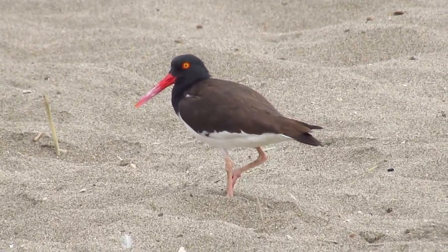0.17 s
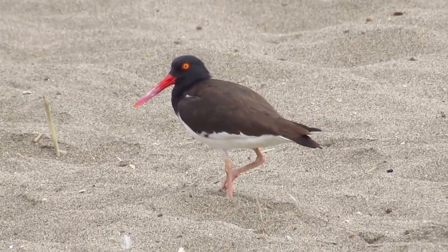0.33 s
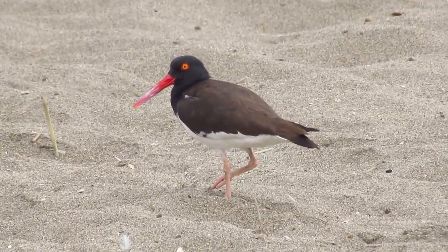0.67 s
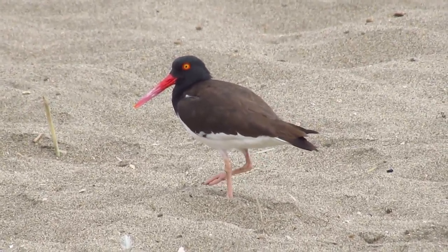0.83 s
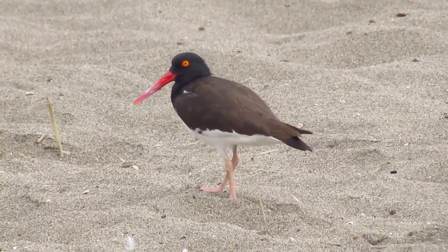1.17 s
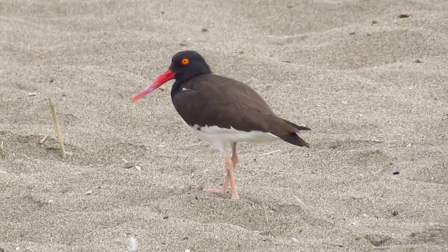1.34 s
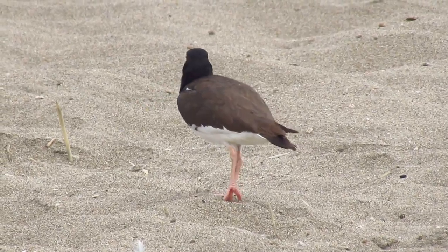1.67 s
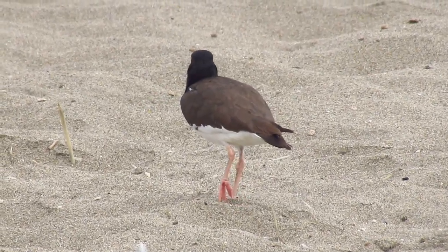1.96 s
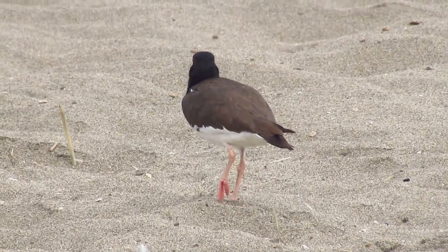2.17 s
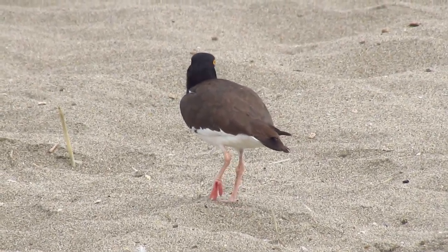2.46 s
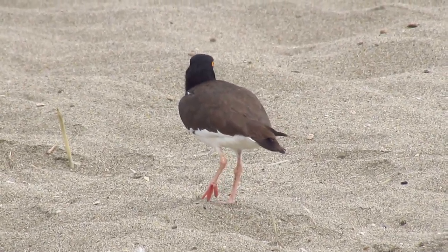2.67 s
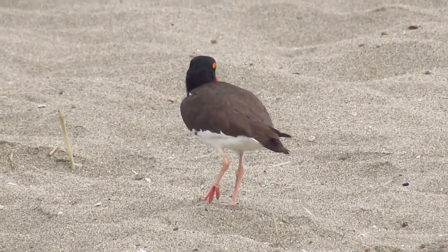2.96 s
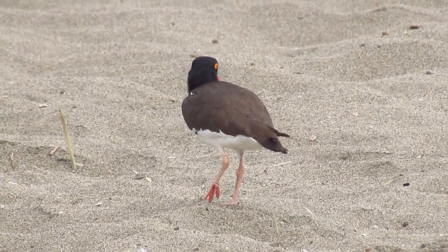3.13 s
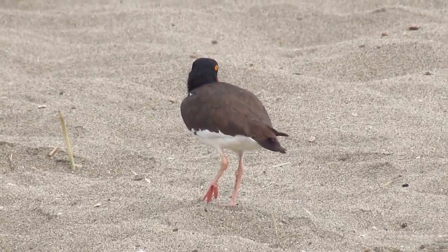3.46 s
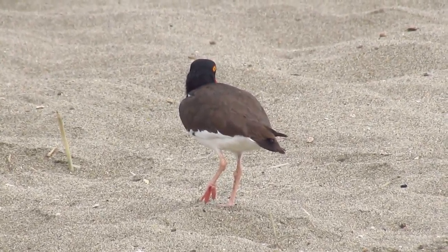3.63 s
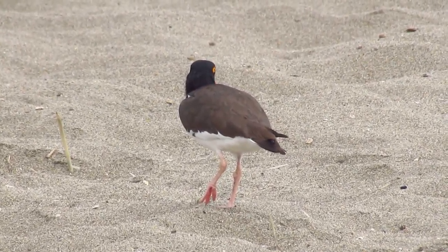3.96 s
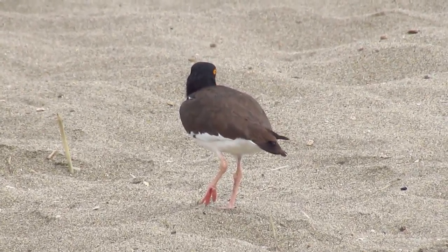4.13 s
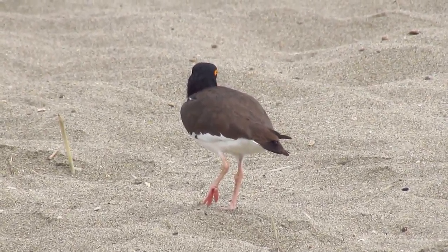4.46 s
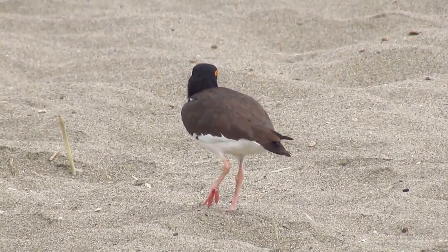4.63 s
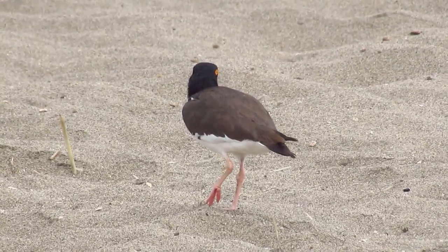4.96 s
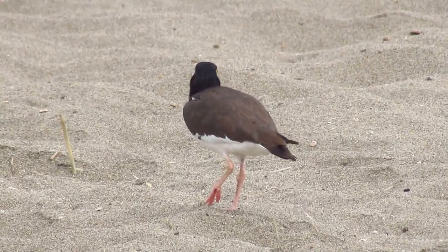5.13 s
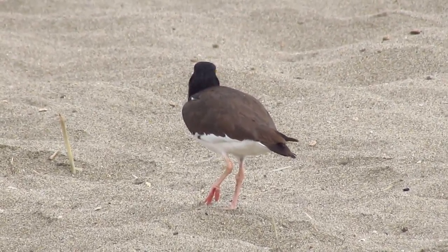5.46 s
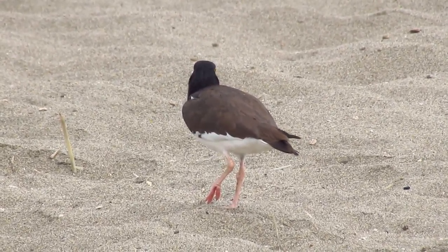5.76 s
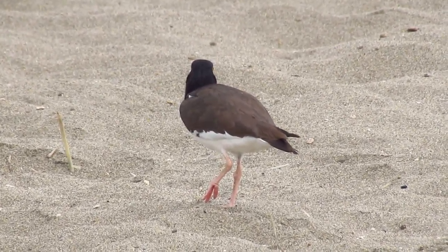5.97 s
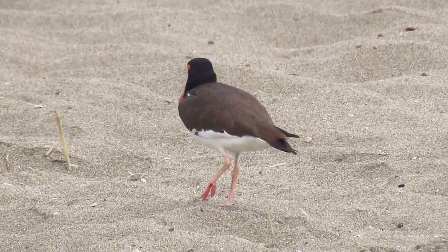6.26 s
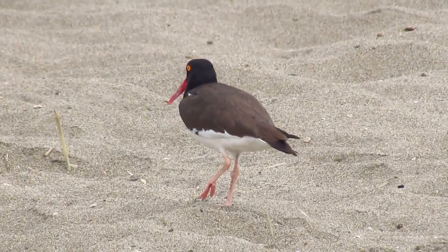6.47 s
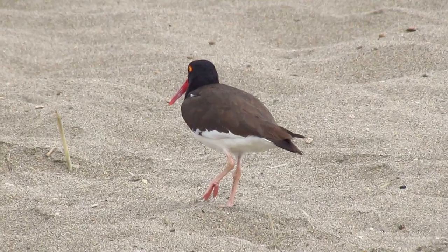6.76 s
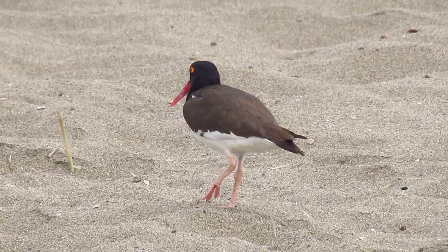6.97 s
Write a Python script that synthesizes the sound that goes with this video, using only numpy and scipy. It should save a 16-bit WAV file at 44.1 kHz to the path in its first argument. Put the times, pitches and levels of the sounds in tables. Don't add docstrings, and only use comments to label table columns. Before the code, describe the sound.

An open sandy beach with oystercatchers, heard through a small wind-struck stereo microphone. Low wind rumble runs throughout, heaviest on the right, with irregular thumps and fluttering rattles; faint smooth surf hiss lies behind. From 0.1 s distant birds on the left give short, thin pips, often in pairs, and a faint arched whistle at 0.5 s. Buffets thud around 0.7 s. A clear falling whistle breaks from a tiny rattle at 1.4 s, a fainter one at 1.8 s. The hardest gust cracks at 2.25 s, briefly hushing the surf. Sharper calls follow at 3.0, 3.7 and 4.7 s, amid dense buffeting from 3.5 to 4.5 s. From 5.3 to 6.4 s a lower bird trills, slowing while climbing slightly. At 6.5 s a close bird whistles loudly, dropping in pitch; after a hoarse chirp at 6.8 s, its last whistle is cut short at 7.1 s.

```python
import sys
import numpy as np
from scipy import signal
from scipy.fft import rfft, irfft
from scipy.io import wavfile
from scipy.ndimage import uniform_filter1d

SR = 44100
rng = np.random.default_rng(int(sys.argv[2]) if len(sys.argv) > 2 else 0)


def transcribe(signal):
    frames = np.atleast_2d(signal).T
    limited = np.clip(frames, -1, 1)
    pcm = np.round(limited * 32767).astype(np.int16)
    wavfile.write(sys.argv[1], SR, pcm)


def volts_from_db(level):
    exponent = np.asarray(level, float) / 20
    return 10 ** exponent


N = 313110

# start in seconds, crack level in dB, gain drop after it in dB.
OVERLOADS = [
    (0.6688, -50, -3),
    (2.2554, -32, -10.5),
    (3.554, -40, -2),
    (6.21, -42, -1.5),
]


def evened(x):
    return x / np.sqrt(np.mean(x ** 2) + 1e-20)


def read(points, hz, column=1):
    table = np.transpose(points)
    return np.interp(np.log(hz + 1), np.log(table[0] + 1), table[column])


def add(mix, s, sound):
    part = mix[round(s * SR):][:len(sound)]
    part += sound[:len(part)]


def band_noise(size, order, low_hz, high_hz):
    band = signal.butter(order, [low_hz, high_hz], "band", fs=SR, output="sos")
    return signal.sosfilt(band, rng.standard_normal(size))


def partials(hz, levels_db, multiples, edge_s, broken_db=0, rough=0):
    wobble = uniform_filter1d(rng.standard_normal(len(hz)), 120)
    turns = np.cumsum(hz * (1 + (0.016 + rough) * wobble)) / SR
    stack = np.zeros(len(hz))
    for k, db in zip(multiples, levels_db):
        noise = rng.standard_normal(len(hz))
        flicker = evened(uniform_filter1d(uniform_filter1d(noise, 180), 180))
        sine = np.cos(2 * np.pi * k * turns + k * k)
        stack += volts_from_db(db + broken_db * flicker) * sine * (k * hz < 15600)
    return np.sqrt(2) * stack * signal.windows.tukey(len(hz), min(1, 2 * edge_s * SR / len(hz)))


def unroll(rows):
    s, *columns = np.transpose(rows)
    t = np.arange(s[0], s[-1], 1 / SR)
    return s[0], [np.interp(t, s, c) for c in columns]


def whistle(rows, colour, share, first_dull_db=0):
    s, (hz, effort_db, bill_db) = unroll(rows)
    sag = 1 - hz / hz.max()
    hook = 1 - 0.047 * np.exp(-np.arange(len(hz)) / SR / 0.0021)
    first_db = effort_db + np.linspace(colour[0], colour[1], len(hz)) + first_dull_db * sag
    top_db = effort_db + share * (bill_db - effort_db) - 36 * sag
    levels_db = [first_db, effort_db, bill_db] + [top_db + db for db in colour[2:]]
    first_hz = uniform_filter1d(hz / 2, 350, mode="nearest") * hook
    return s, partials(first_hz, levels_db, range(1, 7), edge_s=0.0019, broken_db=0.6)


def far_whistle(s, length, from_hz, to_hz, second_db, first_db):
    u = np.linspace(0, 1, round(length * SR))
    hz = (from_hz + (to_hz - from_hz) * u) / 2 * (1 + 0.01485 * np.sin(np.pi * u))
    return s, partials(hz, [first_db, second_db], range(1, 3), edge_s=.01, broken_db=3.0)


def add_whistles(flock, near):
    # time in seconds, second partial in Hz, its effort in dB, overtone strength from bill in dB.
    early = [
        [(.52, 4980, -61, -61), (.57, 5150, -56.5, -69), (.62, 5250, -51, -72), (.714, 5080, -54, -75),
         (.765, 4720, -59, -72)],
        [(1.383, 4760, -41, -60), (1.392, 4930, -40, -54), (1.425, 5130, -39, -53), (1.455, 5234, -40, -52),
         (1.487, 4980, -43, -56), (1.503, 5000, -43, -58), (1.54, 4520, -47.5, -71), (1.56, 4200, -54, -91)],
        [(3.033, 4700, -39.5, -54), (3.042, 4970, -37.5, -48), (3.057, 5190, -36.5, -51),
         (3.085, 5040, -38.5, -51), (3.109, 5190, -37.5, -50), (3.133, 4860, -38.5, -50),
         (3.177, 4360, -42.5, -68), (3.188, 4290, -44, -75)],
    ]
    later = [
        [(3.737, 4660, -44.5, -49.5), (3.79, 5120, -42.5, -55), (3.825, 5196, -39.5, -63),
         (3.89, 5150, -41.5, -60), (3.934, 4830, -45, -55), (3.955, 4530, -51, -63)],
        [(4.727, 4880, -41, -48), (4.738, 5020, -37.5, -40), (4.763, 5177, -36.5, -41.5),
         (4.841, 5070, -37.5, -40), (4.879, 4390, -41.5, -62), (4.905, 4210, -47, -65)],
        [(1.838, 4840, -60, -59), (1.864, 5330, -54.5, -69), (1.892, 5320, -49.5, -57),
         (1.92, 5090, -50.5, -69), (1.945, 5250, -47.5, -68), (2.008, 5235, -47, -76),
         (2.045, 5080, -46.5, -56), (2.07, 4800, -46.5, -51.5), (2.085, 4430, -54, -73)],
    ]
    close = [
        [(6.549, 4670, -36, -59), (6.56, 4770, -36, -52), (6.58, 4896, -33, -44.5), (6.61, 4946, -35, -51),
         (6.647, 4890, -37.5, -44.5), (6.685, 4360, -36, -57), (6.712, 4120, -36.5, -74),
         (6.742, 3820, -43.5, -78)],
        [(6.897, 4400, -45, -51), (6.905, 4740, -41, -47), (6.93, 4900, -49, -69), (6.962, 5130, -42, -49),
         (7.008, 4930, -42, -59), (7.028, 4970, -42, -65), (7.065, 4810, -40.5, -68), (7.1, 4730, -40, -50)],
    ]
    # first partial at the start in dB, at the end in dB, fourth, fifth and sixth partial in dB.
    colours = [(-3, -2.5, -14, -38, -52), (-9, 1, -10.5, -34, -53), (-4.5, -2, -13, -23, -48),
               (2.5, 2.5, -20, -29.5, -52), (-2, -1, -9.5, -20.5, -45), (14.5, -11, -13, -29, -50)]
    near_colours = [(-9, -9.5, -18, -26, -35), (3.5, -2.5, -28, -19, -41)]
    bill_shares = [.5, .5, .5, .5, .5, .3, .5, .15]
    # start and length in seconds, second partial from Hz, to Hz, second and first partial in dB.
    far_calls = [
        (0.22, 0.29, 5050, 5400, -71, -68),
        (1.03, 0.153, 4620, 4600, -63.5, -71),
        (2.601, 0.207, 5090, 5120, -73, -67.5),
        (3.75, 0.12, 4140, 4500, -65, -80),
        (4.154, .132, 4310, 4660, -61, -67),
        (5.001, 0.195, 5320, 5400, -70, -72),
    ]
    for rows, colour, share in zip([*early, *later], colours, bill_shares):
        add(flock, *whistle(rows, colour, share))
    for rows, colour, share in zip(close, near_colours, bill_shares[-2:]):
        add(near, *whistle(rows, colour, share, first_dull_db=-82))
    for row in far_calls:
        add(flock, *far_whistle(*row))


def low_register(rows, dull_db=0):
    # frequency in Hz, throat gain in dB.
    throat = [(2000, -1.5), (3300, 0.5), (4300, 4.5), (5000, -3.5), (7000, -20), (11000, -26)]
    s, (hz, first_db, throat_db, *half) = unroll(rows)
    half = np.clip(half[0] if half else .02, .01, 3)
    multiples = np.arange(2, 14) / 2
    levels_db = [first_db]
    for k in multiples[1:]:
        half_db = 20 * np.log10(half) * (k % 1 > 0)
        levels_db.append(throat_db + read(throat, k * hz) + dull_db * max(k - 2, 0) + half_db)
    slack = np.minimum(half, 1)
    return s, partials(hz, levels_db, multiples, edge_s=0.0011, broken_db=1.0 + 0.3 * slack, rough=0.12 * slack)


def climb(s, length, from_hz, to_hz, db, early, first_db=-17):
    shape = [(0, 0, -11, 0.36), (.25, 0.46 * early, 0.5, 0.17), (.55, early, 2, .1), (1, 0.83, 1, 0.18)]
    return low_register([(s + u * length, from_hz + up * (to_hz - from_hz), db + first_db + soft_db, db + soft_db, half)
                         for u, up, soft_db, half in shape])


def split(s, length, from_hz, to_hz, db, linger):
    shape = [(0, 0, -3), (linger, .06, 0), (.4 + 0.67 * linger, .6, -1), (1, 1, -7)]
    return low_register([(s + u * length, from_hz + up * (to_hz - from_hz), db - 7, db + soft_db, 2.5)
                         for u, up, soft_db in shape])


def lead_in(s, end, hz, first_db, throat_db, dull_db=0):
    swell_db, hz_per_s = -9.5, 6750
    return low_register([(s, hz, first_db + swell_db, throat_db + swell_db),
                         (end, hz + hz_per_s * (end - s), first_db, throat_db)], dull_db)


def tick(s, db):
    noise = band_noise(260, 2, 2200, 6500)
    return s - .003, volts_from_db(db) * evened(noise) * np.hanning(len(noise))


def rasp(s, length, low_hz, high_hz, db):
    u = np.linspace(0, 1, round(length * SR))
    noise = evened(band_noise(len(u), 3, low_hz, high_hz))
    return s, volts_from_db(db) * noise * u ** 0.79 * np.minimum((1 - u) / .12, 1)


def curl(s, length, from_hz, to_hz, db):
    u = np.linspace(0, 1, round(length * SR))
    return s, partials(from_hz + (to_hz - from_hz) * u ** 2.2, [db], [1], edge_s=.003, broken_db=4.0)


def add_run_ups(flock, near):
    # start and length in seconds, from Hz, to Hz, throat level in dB, early share of the rise (0-1).
    climbs = [
        (1.321, 0.028, 1197, 1700, -58.5, 0.46),
        (1.787, 0.023, 1275, 1570, -64, 0.6),
        (2.955, 0.034, 1110, 1520, -56.5, .8),
        (3.672, 0.039, 1253, 1570, -59, .75),
        (4.647, 0.046, 1087, 1490, -54.5, 0.9),
        (6.481, 0.04, 1070, 1487, -54.5, 0.68),
    ]
    # start and length in seconds, from Hz, to Hz, throat level in dB.
    half_line_strokes = [
        (1.347, 0.028, 1520, 1820, -66),
        (2.983, 0.027, 1420, 1760, -60.5),
        (3.652, 0.027, 1484, 1600, -66),
        (4.679, 0.033, 1440, 1770, -61),
        (6.508, 0.022, 1380, 1640, -57),
    ]
    lingers = [.15, 0.11, .3, .45, 0.38]
    # start and break in seconds, from Hz, first partial in dB, throat level in dB.
    lead_ins = [
        (1.366, 1.387, 1724, -56, -68),
        (1.808, 1.84, 1640, -52, -56.5),
        (2.996, 3.037, 1670, -49, -57),
        (3.708, 3.736, 1590, -51.5, -53.5),
        (4.699, 4.729, 1733, -45, -55),
        (6.511, 6.55, 1586, -48.5, -57),
        (6.858, 6.896, 1483, -43, -36.5),
    ]
    # time in seconds, level in dB.
    breaks = [
        (1.383, -54),
        (2.988, -51),
        (3.036, -54),
        (3.738, -54),
        (4.696, -48),
        (4.729, -53),
        (6.514, -50),
        (6.553, -54),
        (6.9, -54),
    ]
    # start and length in seconds, low Hz, high Hz, level in dB.
    rasps = [
        (2.94, 0.083, 2400, 5770, -54),
        (3.648, 0.049, 2200, 5800, -53),
        (4.632, 0.079, 2200, 6500, -53),
        (6.455, 0.055, 2500, 5800, -58),
        (6.822, 0.045, 3400, 4330, -44.5),
    ]
    # start and length in seconds, from Hz, to Hz, level in dB.
    near_strokes = [
        (6.824, .043, 3560, 4700, -55),
        (6.848, 0.017, 1230, 1500, -51),
    ]
    splits = [(*row, linger) for row, linger in zip(half_line_strokes, lingers)]
    for mix, voice, calls in [(flock, climb, climbs[:-1]), (flock, split, splits[:-1]), (near, split, splits[-1:]),
                              (near, curl, near_strokes), (flock, lead_in, lead_ins[:-2]),
                              (flock, rasp, rasps[:-2]), (near, rasp, rasps[-2:]),
                              (flock, tick, breaks[:-3]), (near, tick, breaks[-3:])]:
        for row in calls:
            add(mix, *voice(*row))
    add(near, *climb(*climbs[-1], first_db=2))
    for row in lead_ins[-2:]:
        add(near, *lead_in(*row, dull_db=-18))


def tail(s, length, hz, db, throat_db, sag_per_s=1.5):
    return low_register([(s + u * length, hz * (1 - sag_per_s * length * u ** 1.2), db - 7 * u, throat_db)
                         for u in (0, .5, 1)])


def add_tails(flock, near):
    # start and length in seconds, start Hz, first partial in dB, throat level in dB.
    tails = [
        (1.561, 0.097, 1710, -63, -78),
        (3.19, 0.033, 1790, -48.5, -62),
        (3.946, 0.045, 1705, -53.5, -70),
        (4.895, 0.036, 1700, -59, -70),
        (6.739, 0.056, 1550, -50.5, -67),
    ]
    # start and length in seconds, from Hz, to Hz, level in dB.
    curls = [
        (1.558, .04, 3480, 3250, -62),
        (3.952, 0.0089, 3530, 3270, -54),
        (3.989, .022, 3080, 2750, -59),
        (4.014, .014, 2600, 2100, -67),
        (4.276, 0.02, 4630, 3670, -62),
    ]
    for row in tails[:-1]:
        add(flock, *tail(*row))
    for row in curls:
        add(flock, *curl(*row))
    add(near, *tail(*tails[-1], sag_per_s=4))


def pip(s, length, top_hz, *levels_db):
    u = np.linspace(0, 1, round(length * SR))
    arch = 1 - np.where(u < .3, 0.042 * (1 - u / 0.36) ** 2, 0.103 * ((u - .3) / 0.7) ** 2)
    return s, volts_from_db(-0.9 - 5.7 * u ** 2) * partials(top_hz * arch, levels_db, range(1, 4), edge_s=0.0022)


def grace(s, top_hz, first_db):
    hz = top_hz * np.linspace(.6, .76, 700)
    return s - .016, partials(hz, [first_db - 16, first_db - 15], range(1, 3), edge_s=0.0035)


def add_pips(flock):
    # start in seconds, top Hz, first partial in dB, second partial in dB.
    pips = [(0.127, 2470, -58, -63), (.194, 2470, -56, -55), (.393, 2460, -55, -57),
            (0.468, 2370, -55, -60), (0.919, 2506, -57, -64), (1.005, 2420, -58, -65),
            (1.736, 2430, -61, -60), (2.089, 2346, -59, -59), (2.55, 2430, -60, -66),
            (2.62, 2390, -67, -63), (2.817, 2420, -56.5, -60.5), (2.89, 2400, -56, -62),
            (3.17, 2410, -52, -54), (3.373, 2430, -52.5, -56.5), (3.446, 2420, -55, -56.5),
            (3.999, 2380, -68, -60), (4.187, 2400, -69, -57), (4.268, 2370, -64, -59),
            (4.395, 2260, -70, -67), (4.481, 2390, -72, -58), (4.555, 2380, -72, -65),
            (5.106, 2490, -59, -64), (5.174, 2390, -59, -63), (5.403, 2400, -56, -61),
            (5.655, 2380, -58, -64), (5.735, 2330, -63, -69), (5.925, 2400, -63, -64),
            (5.994, 2330, -62, -59), (6.735, 2250, -67, -64), (6.956, 2240, -64, -63)]
    for s, hz, first_db, second_db in pips:
        third_db = second_db - 15 + 11 * s * SR / N
        add(flock, *pip(s, .035, hz, first_db, second_db, third_db))


def add_trill(flock):
    # start in seconds, level in dB.
    trill = [(5.268, -57), (5.348, -55), (5.432, -51.5), (5.517, -50.5), (5.607, -53), (5.703, -50.5),
             (5.807, -48.5), (5.917, -51), (6.01, -55), (6.1, -56), (6.214, -55), (6.318, -52),
             (6.419, -56)]
    for s, db in trill:
        hz = 1996 + 291 * (s - trill[0][0])
        add(flock, *pip(s, 0.0263, hz, db, db - 12, db - 15))
        add(flock, *grace(s, hz, db))


def capsules(x, side):
    hz = np.fft.rfftfreq(N, 1 / SR)
    ratio = volts_from_db(read(side, hz)) * np.exp(1j * read(side, hz, column=2))
    return irfft(4 * rfft(x) * np.array([ratio, ratio ** 0]) / (1 + ratio), N)


def birds():
    # frequency in Hz, level in dB, radians ahead.
    flock_side = [(2100, 3.5, 0.67), (2520, 6, 0.51), (4500, 3, -0.28), (5250, 0, -0.043), (7600, 2, 0.63),
                  (10200, 0, 0.62), (13000, 1, 1.25)]
    near_side = [(1700, 4.5, -5.2), (2080, 8.4, -3.3), (2500, 10, -.1), (3500, 4, 0), (4950, 5, .5),
                 (7400, 9, 1), (9800, 6, 1.9), (12400, 2, 4.6)]
    flock, near = np.zeros((2, N))
    add_whistles(flock, near)
    add_run_ups(flock, near)
    add_tails(flock, near)
    add_pips(flock)
    add_trill(flock)
    near *= np.minimum(np.arange(N)[::-1] / 250, 1)
    return (capsules(flock, flock_side) + capsules(near, near_side)) * signal.windows.tukey(N, .002)


def drift(top_hz, size):
    hz = np.fft.rfftfreq(size, 1 / SR)
    shape = (hz > 1.5) / np.sqrt(hz + 4) / (1 + (hz / top_hz) ** 4)
    return evened(irfft(rfft(rng.standard_normal(size)) * shape, size))


def turbulence():
    # frequency in Hz, density in dB per Hz.
    wind_spectrum = [(12, -53), (20, -13.5), (75, 1.5), (142, -0.5), (302, -9.5), (633, -31.5), (1100, -53),
                     (1430, -70), (2420, -120)]
    hz, eddies = np.fft.rfftfreq(N, 1 / SR), drift(36.6, size=N)
    colour_db = read(wind_spectrum, hz) - 12 * np.log2(np.maximum(hz / 1100, 1))
    noise = rfft(rng.standard_normal(N)) * volts_from_db(colour_db)
    octave = np.clip(np.log2(hz / 50 + 1e-9), 0, 4)
    total = np.zeros(N)
    for k, depth_db in enumerate([1.2, 2.0, 2.8, 3.6, 4.0]):
        layer = irfft(noise * np.clip(1 - abs(octave - k), 0, 1), N)
        swell = eddies + .5 * drift(18, size=N)
        total += layer * volts_from_db(depth_db * swell - depth_db ** 2 / 7)
    return evened(total)


def blow(hz):
    u = np.arange(-400, 400) / SR * np.pi * hz
    return (1 - 2 * u ** 2) * np.exp(-u ** 2)


def wind():
    # time in seconds, gust level in dB.
    gusts = [(0.0, -34), (0.69, -28), (0.91, -30), (1.25, -30.5), (2.26, -29), (2.29, -34.5), (3.58, -26.5),
             (3.7, -32.5), (3.89, -25), (4.05, -30.5), (4.26, -28.5), (4.36, -33.5), (4.81, -28.5),
             (5.3, -31.5), (5.63, -28), (5.73, -32.5), (6.0, -29), (7.1, -28.5)]
    # peak time in seconds, peak in dB, push 1 or pull -1.
    buffets = [(0.5818, -9, -1), (0.6594, -3.5, -1), (0.6684, -0.5, -1), (0.6911, -6, -1),
               (0.7798, -2.4, -1), (1.1903, -5.5, 1), (1.1982, -4, 1), (1.6922, -6.5, -1), (1.7406, -10, 1),
               (1.8523, -9, -1), (1.9795, -1, -1), (2.1056, -8, 1), (2.1224, -6.7, -1), (2.14, -4.1, 1),
               (2.148, -3.5, -1), (2.2557, 1.5, 1), (2.9828, -9.5, 1), (3.1769, -5.5, 1),
               (3.1949, -8.5, -1), (3.3066, -3, -1), (3.3522, -5.5, -1), (3.3597, -7.3, -1),
               (3.386, -6, -1), (3.523, -11.5, 1), (3.5324, -7.1, 1), (3.554, -0.8, 1), (3.625, -9, 1),
               (3.791, -5.5, 1), (3.8561, -4, 1), (3.867, -5.5, 1), (3.8902, -2, -1), (3.9116, -11, 1),
               (3.9213, -1.5, 1), (3.9406, -8, -1), (4.0895, -5.4, 1), (4.1997, -6.5, 1), (4.2106, -5, -1),
               (4.2558, -6.9, -1), (4.2634, -1, -1), (4.4683, -5.5, -1), (4.482, -3, -1), (4.782, -8, -1),
               (4.809, -6.5, -1), (4.857, -6, 1), (4.923, -8.5, -1), (4.954, -8.5, 1), (5.0152, -6.7, 1),
               (5.1438, -5.5, -1), (5.556, -8.5, 1), (5.5786, -4, 1), (5.6034, -7.5, 1), (5.6158, -5.4, 1),
               (5.6329, -6.6, -1), (5.6563, -5.5, -1), (6.0107, -5, -1), (6.0272, -8, -1), (6.21, -1.3, 1),
               (7.0564, -8.5, -1)]
    # time in seconds, level in dB.
    flaps = [(.186, -10), (.322, -21), (.443, -17), (1.849, -7.5), (2.229, -8), (2.389, -20), (2.76, -8.5),
             (3.239, -9), (3.548, -9.5), (3.755, -11), (4.177, -18), (4.239, -11), (4.52, -16),
             (5.201, -18.5), (5.249, -14), (5.566, -6.5), (5.684, -17), (5.925, -7.5), (6.173, -14),
             (6.399, -11)]
    # time in seconds, level in dB.
    rattles = [
        (0.658, -27),
        (.778, -24),
        (1.184, -26.5),
        (2.245, -21),
        (4.086, -29),
        (4.209, -22.5),
        (4.471, -22),
        (5.599, -23.5),
        (5.925, -22),
    ]
    level = 4 * volts_from_db(np.interp(np.arange(N) / SR, *np.transpose(gusts)))
    blows, kicks, churn_dips = np.zeros((3, N))
    lead_s = 400 / SR
    for s, db, sign in buffets:
        add(blows, s - lead_s, np.sign(sign) * volts_from_db(db) * blow(169.3))
        add(churn_dips, s - lead_s, np.hanning(800))
        add(kicks, s - lead_s, volts_from_db(db - 22.5) * np.hanning(800))
    for (s, db), sign in zip(flaps, rng.choice([-1, 1], len(flaps))):
        add(blows, s - .006, sign * volts_from_db(db) * blow(266))
        add(kicks, s - .004, volts_from_db(db - 17.5) * np.hanning(700))
    for s, db in rattles:
        add(kicks, s - .004, volts_from_db(db) * np.hanning(600))
    for s, db, drop_db in OVERLOADS:
        add(blows, s, volts_from_db(db) * np.array([1, -1.2, .5]))
    sharp_pull = np.exp(-(np.arange(-400, 400) / SR / .0008) ** 2)
    add(blows, 2.2541 - lead_s, -volts_from_db(-0.5) * sharp_pull)
    small_eddies = evened(band_noise(N, 3, 230, 600))
    churn = level * turbulence() * (1 - 0.5 * np.minimum(churn_dips, 1))
    right = churn + blows + kicks * small_eddies
    left = volts_from_db(-11.0) * (level * turbulence() + 0.32 * np.roll(right, -8))
    return np.array([left, right]) * signal.windows.tukey(N, .002)


def surf():
    # frequency in Hz, density in dB per Hz.
    surf_spectrum = [(290, -16), (500, -20), (530, -7), (879, -6.5), (1160, -13), (2090, -13), (3190, -20),
                     (6570, -25), (14300, -44), (15900, -57)]
    # time in seconds, level in dB.
    surf_level = [(0.0, -56.5), (2.16, -57), (5.26, -58.5), (7.1, -54)]
    # frequency in Hz, likeness of the capsules (0-1), left against right in dB.
    surf_pair = [(1000, 0.96, -0.5), (2400, 0.84, -0.5), (3400, 0.73, -1), (4000, 0.97, 2.5),
                 (6200, 0.9, -1), (10000, 0.78, -0.5), (15100, .68, -0.5)]
    frames, hz = N // 256 + 5, np.fft.rfftfreq(1024, 1 / SR)
    a, b, c, d, patches = rng.standard_normal((frames, 513, 5)).T
    patches = evened(uniform_filter1d(uniform_filter1d(patches, 12, 0), 14, 1))
    same = np.clip(read(surf_pair, hz), -1, 1)[:, None]
    tilt = volts_from_db(read(surf_pair, hz, column=2) / 2)[:, None]
    left = a + 1j * b
    right = same * left + np.sqrt(1 - same ** 2) * (c + 1j * d)
    z = np.array([left * tilt, right / tilt])
    z *= volts_from_db(read(surf_spectrum, hz)[:, None] + 0.3 * patches)
    middle = hz[(hz > 1100) & (hz < 1900)]
    z /= np.sqrt(np.sum(volts_from_db(read(surf_spectrum, middle)) ** 2))
    hiss = signal.istft(z, nperseg=1024, noverlap=768)[1][:, :N]
    return hiss * volts_from_db(7.0 + np.interp(np.arange(N) / SR, *np.transpose(surf_level)))


def scene():
    t = np.arange(N) / SR
    hush_db = sum(drop_db * (t > s) * np.exp(-abs(t - s) / 0.28) for s, db, drop_db in OVERLOADS)
    return birds() + wind() + surf() * volts_from_db(hush_db)


def roll_off(x):
    return signal.sosfilt(signal.butter(12, 16020, fs=SR, output="sos"), x)


def record(dry):
    wide = np.clip(dry - .5 * dry[::-1], -.995, .995)
    hz, t, z = signal.stft(wide, SR, nperseg=1024)
    power = abs(z) ** 2
    power_db = 10 * np.log10(power + 1e-14)
    loudest_db = np.maximum.accumulate(np.where(hz[:, None] > 3800, power_db, -140), 1)
    smooth_db = 10 * np.log10(uniform_filter1d(power, 10, 1) + 1e-14)
    kept = smooth_db > loudest_db - np.where(hz > 9800, 41, 48)[:, None]
    mix = signal.istft(z * kept, SR, nperseg=1024)[1][:, :N]
    return roll_off(mix)


dry = scene()
out = record(dry)
transcribe(out)
```